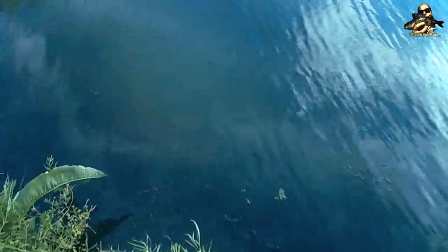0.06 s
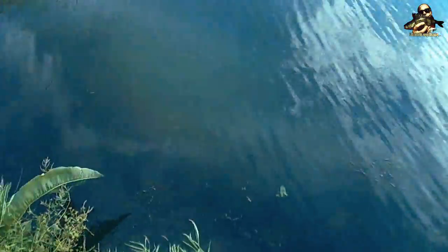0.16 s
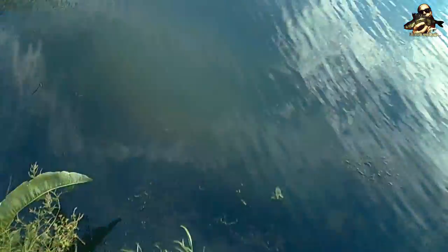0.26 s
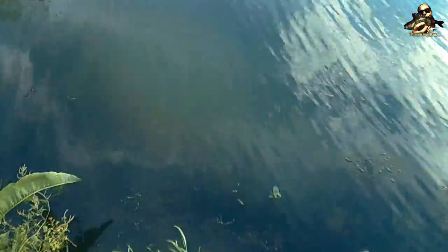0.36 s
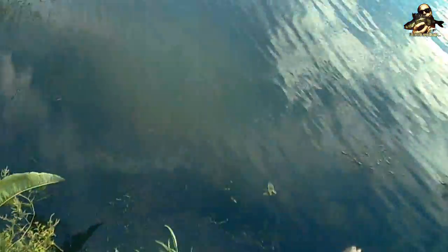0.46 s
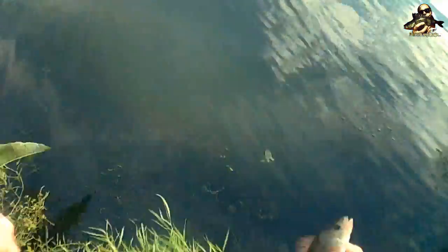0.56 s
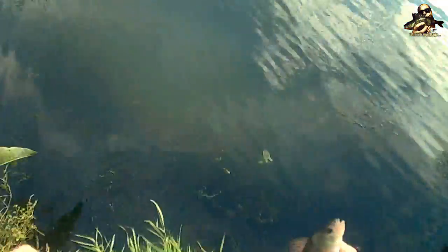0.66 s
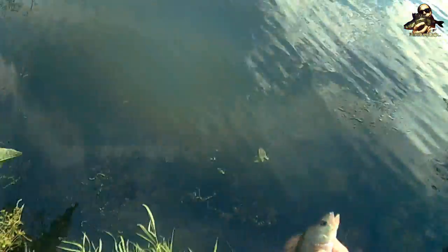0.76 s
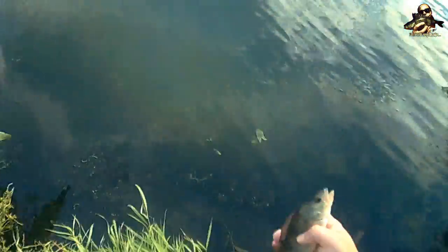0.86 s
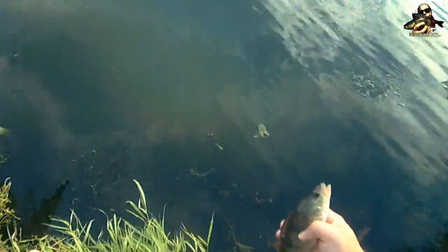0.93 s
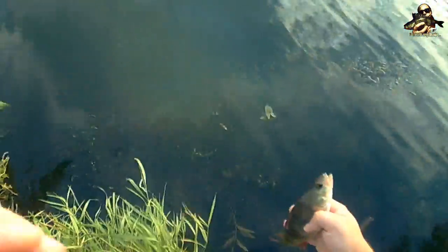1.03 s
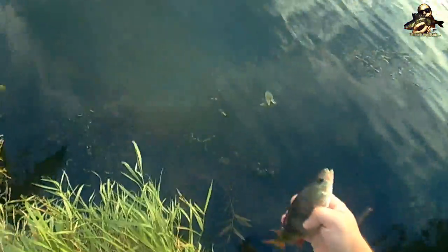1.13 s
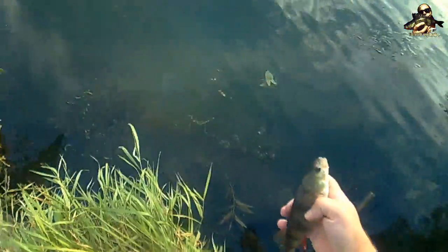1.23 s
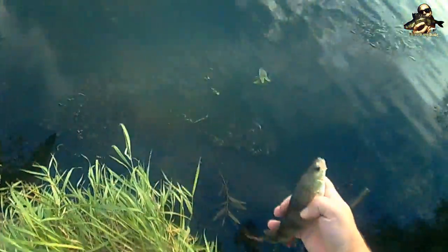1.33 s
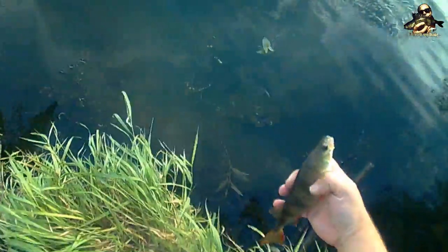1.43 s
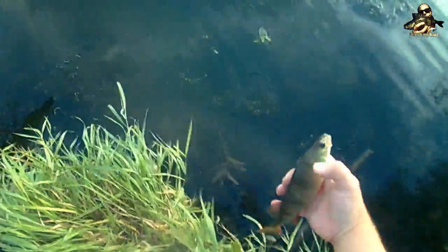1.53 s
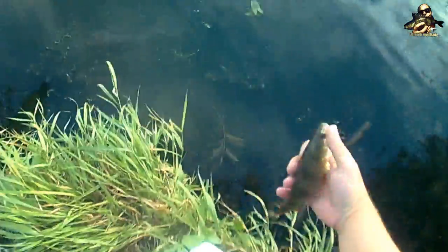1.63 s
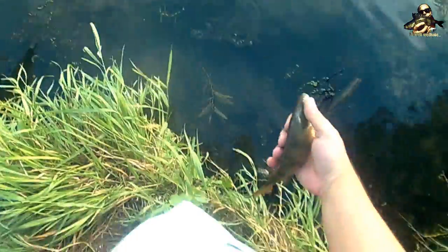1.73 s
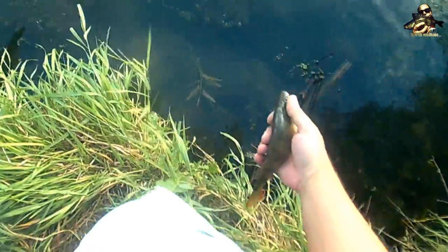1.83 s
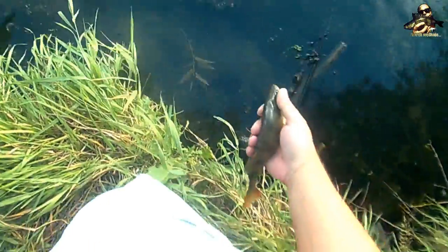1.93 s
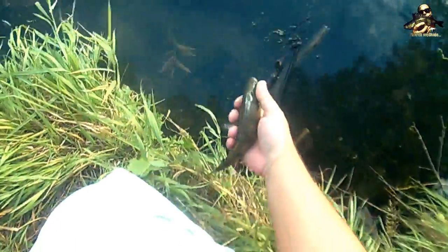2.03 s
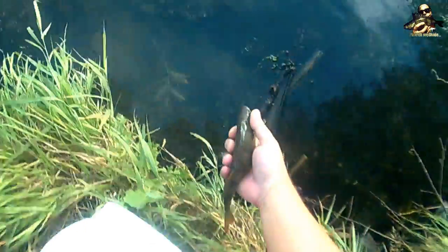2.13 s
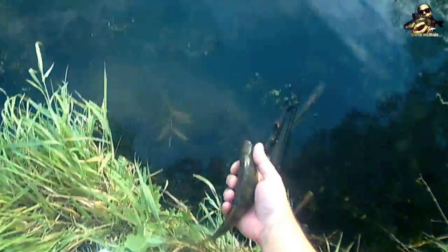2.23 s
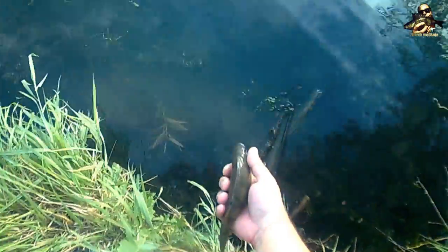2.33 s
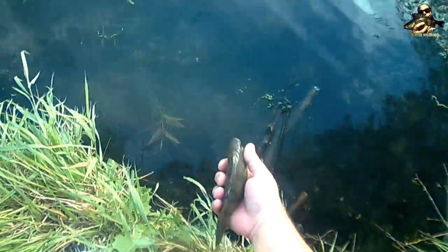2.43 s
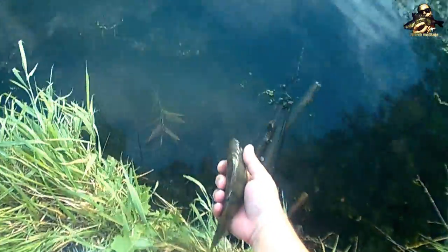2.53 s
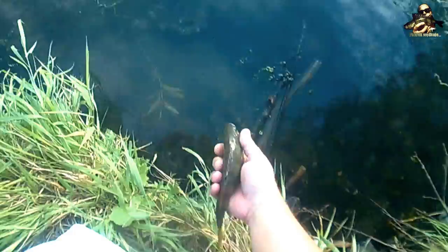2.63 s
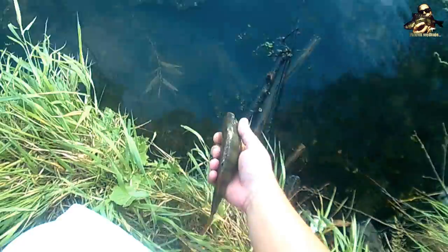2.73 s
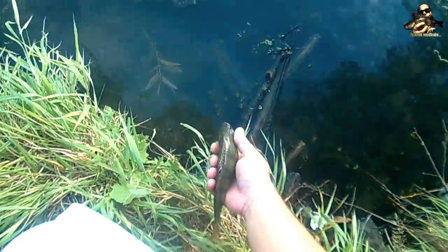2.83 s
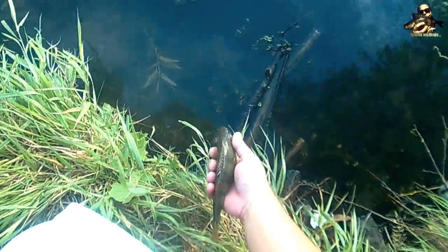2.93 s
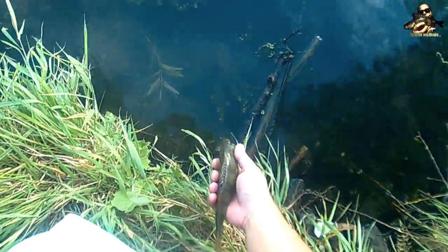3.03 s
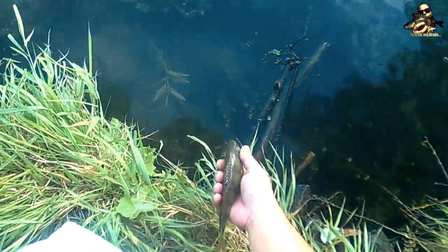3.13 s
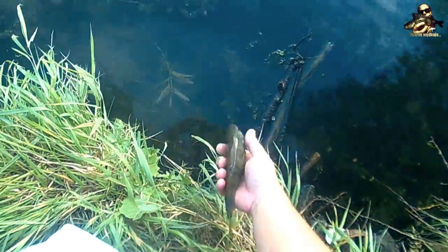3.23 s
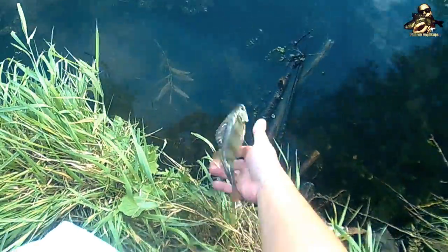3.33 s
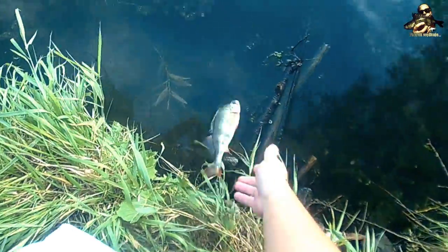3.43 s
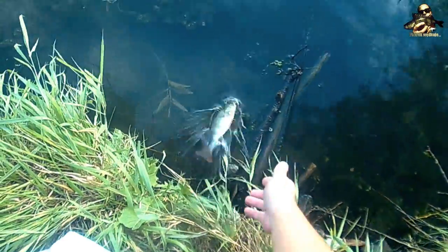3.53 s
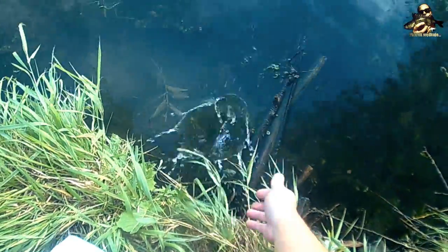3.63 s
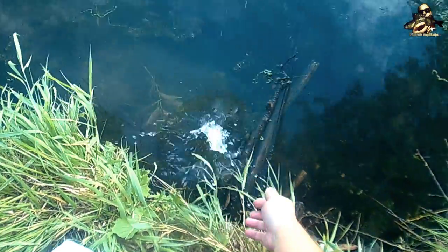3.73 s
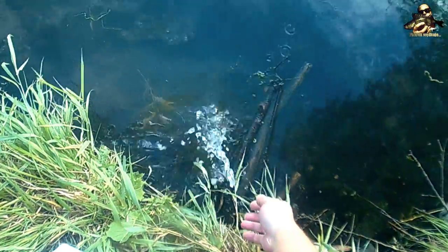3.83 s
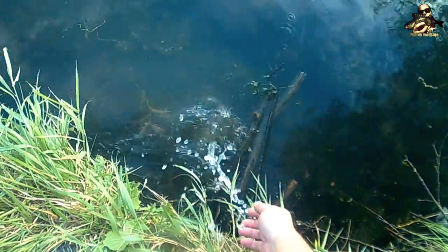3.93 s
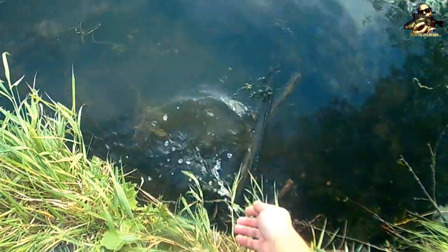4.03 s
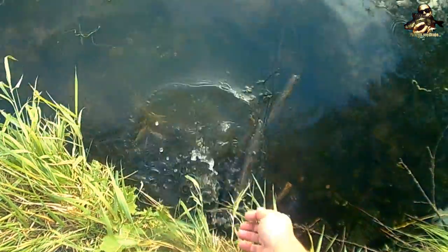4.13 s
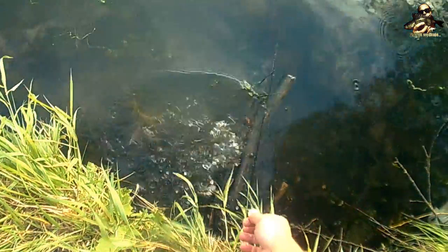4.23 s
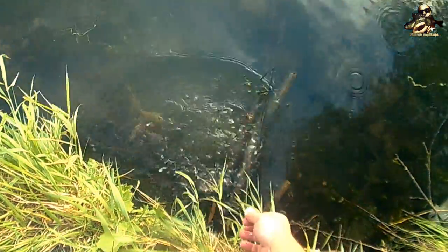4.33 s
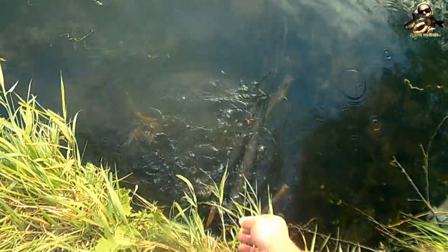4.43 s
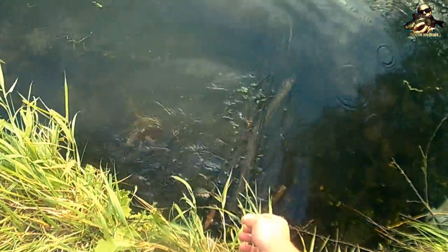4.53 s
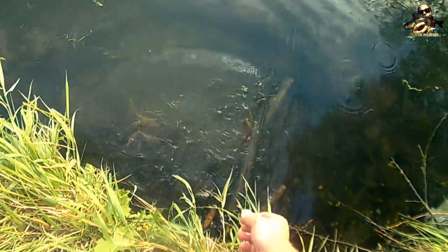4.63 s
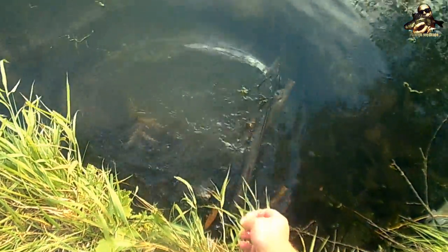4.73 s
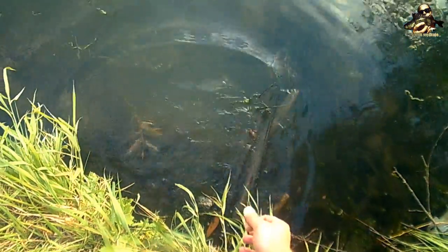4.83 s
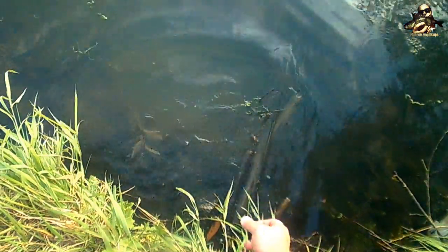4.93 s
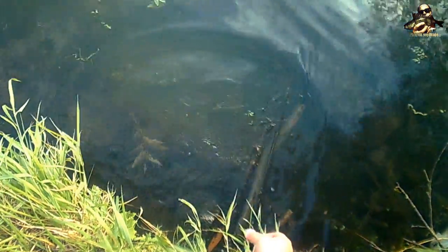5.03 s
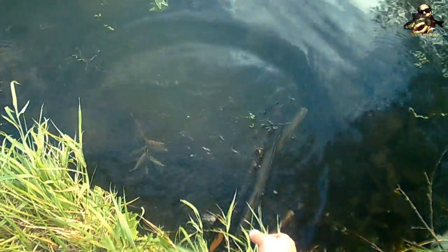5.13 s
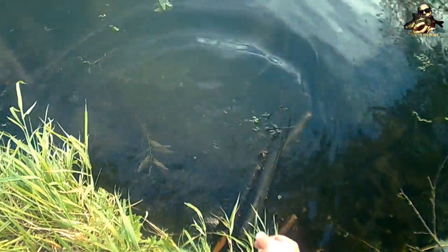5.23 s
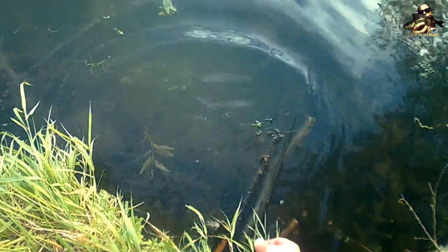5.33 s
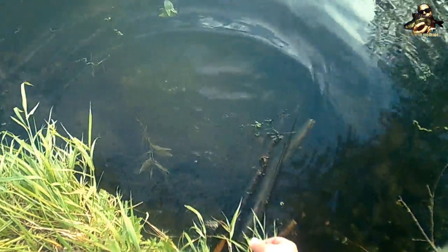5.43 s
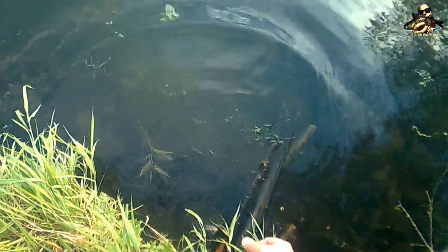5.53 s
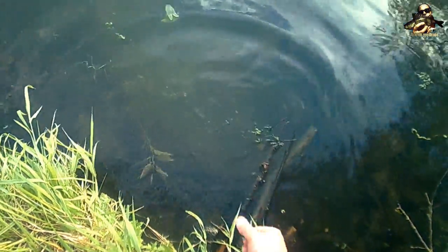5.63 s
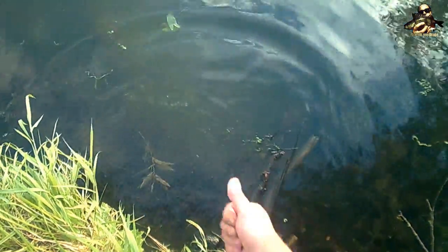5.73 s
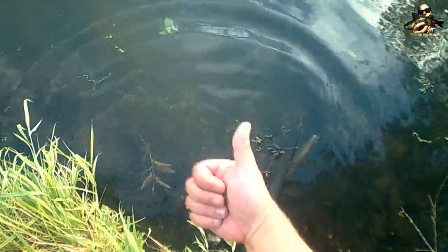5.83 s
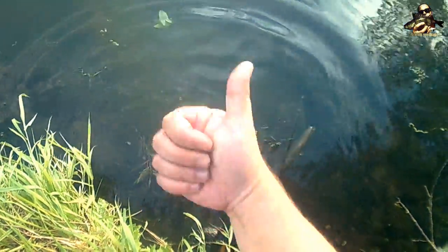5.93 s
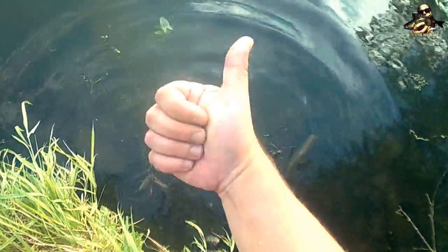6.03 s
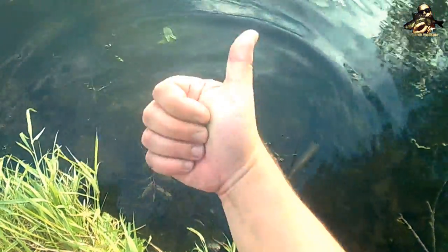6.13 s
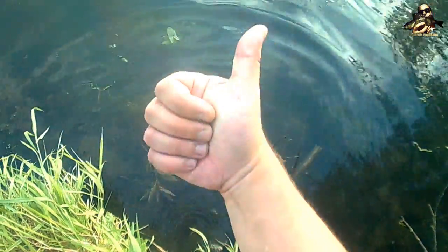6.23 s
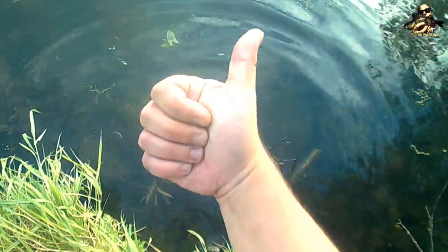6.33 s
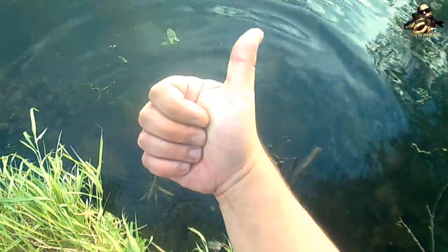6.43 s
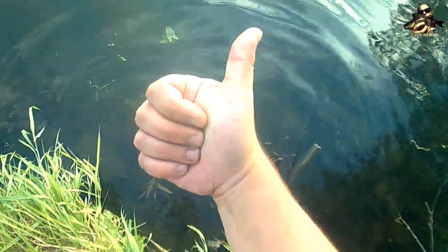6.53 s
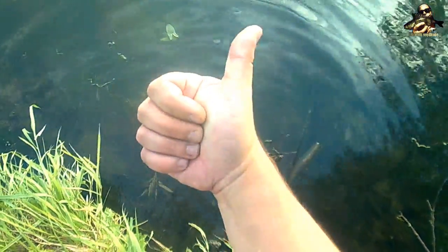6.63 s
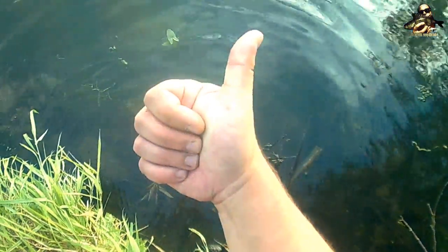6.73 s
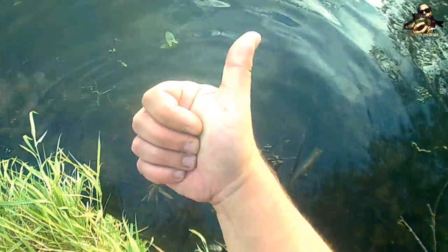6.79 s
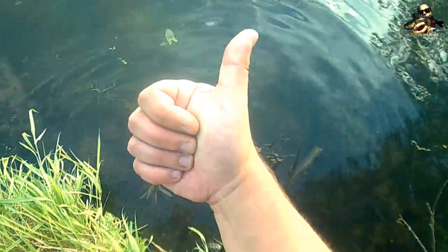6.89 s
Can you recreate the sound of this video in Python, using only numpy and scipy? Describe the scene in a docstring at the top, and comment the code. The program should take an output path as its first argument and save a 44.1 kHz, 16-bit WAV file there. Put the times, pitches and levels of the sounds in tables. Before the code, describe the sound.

Clothing rustles softly right by the microphone, then its plastic mount gives a cluster of sharp knocks and tiny creaks, followed by one more click. After a short lull, a fish tossed from the bank slaps into a calm river with a light spray and a brief run of gurgling bubbles. Only a faint, steady outdoor hiss and a few tiny drips remain. Everything sounds muffled and boxy.

```python
"""Clothing rustles close by, then a camera mount knocks and creaks as an angler bends on a grassy bank.
A tossed fish slaps the calm river: a low thud, a thin spray, and trapped air ringing as bubbles.
Far air and river hiss lie underneath. The one microphone is shut in the camera's plastic housing,
which muffles sound above its resonance; a coarse rate change mirrors the sound into the treble."""
import sys
import numpy as np
from scipy import signal
from scipy.fft import rfft, irfft, next_fast_len
from scipy.io import wavfile
from scipy.ndimage import uniform_filter1d

SR = 44100
rng = np.random.default_rng(int(sys.argv[2]) if len(sys.argv) > 2 else 0)


def pcm_store(signal):
    """Save signal as 16-bit PCM."""
    levels = np.round(np.clip(np.atleast_2d(signal), -1, 1) * 32767)
    wavfile.write(sys.argv[1], SR, levels.astype(np.int16).T)


N = 306936

# distant air and river: frequency_hz, relative_db
HISS_SPECTRUM = [(20, -49), (100, -20), (260, -13), (600, -5.5), (850, 0), (1200, -5.5), (1550, -12),
                 (2000, -23), (3000, -38.5), (4000, -45.5), (5000, -58), (9000, -53.5), (17000, -47)]
# rumble of the turning camera: time_s, level_db
RUMBLE_LEVELS = [(0.0, -70), (0.106, -61.5), (0.268, -67), (0.588, -73), (0.7, -79)]
# clothing near the microphone: time_s, level_db, centre_hz
RUSTLE_PATH = [(0.0, -39, 1240), (0.07, -36.5, 1150), (0.27, -53.5, 840), (0.43, -46.5, 900),
               (0.57, -49, 945), (0.8, -39.5, 950), (1.02, -52.5, 1080), (1.27, -54.5, 1190),
               (1.46, -46, 1020), (1.62, -52, 1050), (1.74, -42.5, 1450), (1.87, -62, 1420),
               (1.95, -39.5, 1360), (2.05, -47.5, 970), (2.3, -57, 980), (2.6, -48, 910)]
# creaks of the mount: start_s, length_s, level_db, pitch_hz
MOUNT_CREAKS = [(1.096, 0.015, -21.5, 1400), (1.114, 0.026, -25.5, 1330), (1.172, 0.0164, -17.5, 1530),
                (1.335, .011, -31.5, 1390), (1.354, 0.014, -25.5, 1250), (1.402, 0.031, -36.5, 1336),
                (1.73, 0.02, -32, 1480), (1.745, 0.028, -33.5, 1540), (1.837, 0.048, -41.5, 1430),
                (1.876, 0.024, -32.5, 1470), (1.9, 0.011, -27.5, 1524), (1.95, 0.057, -43, 1490),
                (2.164, 0.012, -43, 1556), (2.379, 0.0045, -35, 1400), (2.414, 0.0081, -12.5, 1507),
                (2.423, 0.0052, -31.5, 1470), (2.443, 0.036, -41.5, 1380)]
# knocks of the mount: start_s, peak_db, contact_ms, main_mode_boost_db
MOUNT_KNOCKS = [(0.078, -32, 0.15, -14), (0.1758, -30.5, 0.1, -8), (1.097, -22, 0.14, 5),
                (1.1009, -6.5, 0.13, -5), (1.1064, -5, 0.059, -4.5), (1.1116, -7.5, 0.25, -5.5),
                (1.138, -2.5, 0.19, -8.5), (1.1444, -15, 0.27, -2), (1.1746, -7.5, 0.035, -4),
                (1.309, -35, 0.15, 7), (1.3365, -23, 0.07, -1), (1.3503, -7.5, 0.18, -8.5),
                (1.3706, -2.5, 0.16, -8), (1.3736, -8, 0.16, -6.5), (1.382, -28, 0.089, -3),
                (1.4137, -21, 0.14, -4), (1.556, -32, 0.071, -6), (1.679, -19.5, 0.17, -3.5),
                (1.7095, -23, 0.18, -2), (1.722, -17.5, 0.16, -3), (1.8946, -21, 0.21, -9),
                (1.9039, -24.5, 0.12, 2), (2.094, -28, 0.24, -6), (2.4151, -4.5, 0.062, -3),
                (4.8986, -34, 0.29, -12), (5.539, -25.5, 0.21, -4.5)]
# resonances of the housing: centre_hz, width_hz, gain_db
HOUSING_MODES = [(488, 440, -18), (1012, 407, -5), (1450, 414, 4), (3060, 720, -4.5)]
# churned water, outside the housing: time_s, level_db
CHURN_LEVELS = [(3.387, -40), (3.446, -45), (3.572, -38), (3.84, -47), (3.946, -42), (4.05, -42.5),
                (4.19, -33.5), (4.32, -81)]
# spray thrown by each slap: start_s, gain_db
SPRAY_BURSTS = [(3.39, -46), (3.411, -38), (3.452, -37), (3.531, -24), (3.543, -29), (3.58, -47),
                (3.93, -40.5), (3.995, -40), (4.06, -48), (4.124, -43), (4.165, -50), (4.233, -50.5)]
# the fish meets the surface: start_s, gain_db, t60_s
FISH_THUD = (3.519, -29.5, 0.11)
# slap pockets, bubbles and drips, outside the housing: start_s, gain_db, pitch_hz, t60_s, glide_per_s
AIR_POCKETS = [(3.4067, -6.5, 1388, 0.029, -27), (3.413, -10, 926, 0.024, -9),
               (3.431, -26.5, 950, 0.024, 4), (3.4535, -11, 1540, 0.0068, -3), (3.454, -22, 850, 0.021, 4),
               (3.473, -29, 1244, 0.033, 8), (3.5164, -11, 1447, 0.023, 3), (3.5194, -3.5, 827, 0.03, 0),
               (3.5228, -4, 1318, 0.059, -8.5), (3.5232, -14.5, 394, 0.02, -12.5),
               (3.5353, -13.5, 1550, 0.025, 3), (3.5336, -8.5, 848, 0.034, 4),
               (3.546, -33.5, 359, 0.18, -0.5), (3.5452, -6, 1320, 0.029, 5), (3.567, -30, 1410, 0.033, -1),
               (3.5968, -24.5, 1390, 0.017, 2.5), (3.6247, -21, 1320, 0.047, 4.5),
               (3.655, -41, 531, 0.19, 9.5), (3.6562, -23.5, 1430, 0.06, 0.5),
               (3.686, -29.5, 980, 0.017, -4), (3.6936, -34, 863, 0.29, 5.5), (3.755, -37, 635, 0.22, 8),
               (3.8636, -17, 1395, 0.028, 3.5), (3.87, -24.5, 1084, 0.052, 4),
               (3.887, -31, 1260, 0.064, 11), (3.915, -18.5, 1375, 0.071, 7.5),
               (3.9316, -16, 1081, 0.11, 1), (3.9314, -16, 1680, 0.016, -7),
               (3.9413, -17.5, 1366, 0.065, -5.5), (3.9444, -14.5, 982, 0.033, -11),
               (3.9538, -28.5, 750, 0.13, 2.5), (3.961, -24.5, 1523, 0.044, -3.5),
               (3.964, -25.5, 1110, 0.074, 11.5), (3.9858, -21.5, 1111, 0.058, 5.5),
               (4.012, -35, 1760, 0.022, 14), (4.061, -25.5, 1024, 0.02, -2),
               (4.0827, -17.5, 915, 0.043, -2.5), (4.112, -20.5, 1513, 0.019, -1),
               (4.113, -19.5, 1243, 0.033, -28), (4.1389, -17, 848, 0.11, 3),
               (4.1402, -27.5, 530, 0.054, 1.5), (4.1525, -23, 741, 0.059, -7),
               (4.1593, -16.5, 865, 0.03, 2), (4.1646, -20.5, 1272, 0.1, -5.5),
               (4.1761, -23, 846, 0.05, -5.5), (4.1905, -23, 1054, 0.032, 10),
               (4.211, -27, 1450, 0.022, 13), (4.268, -39, 1710, 0.035, 0.0),
               (4.554, -30, 1434, 0.018, 2.5), (5.808, -40, 1290, 0.032, 5.0),
               (6.626, -40, 1370, 0.017, 5.0), (6.897, -33, 1380, 0.014, 7)]


def amp(db):
    """Gain of a level in dB."""
    return 10 ** (np.asarray(db) / 20)


def unit(x):
    """Scaled to rms 1."""
    return x / np.sqrt(np.mean(x ** 2) + 1e-20)


def envelope(rows, fade_s=0.036):
    """Gain per sample from time_s and level_db; fades to -90 dB outside the table."""
    times, db = np.transpose(rows)[:2]
    times = [times[0] - fade_s, *times, times[-1] + fade_s]
    return amp(np.interp(np.arange(N) / SR, times, [-90, *db, -90]))


def add(track, start_s, sound):
    """Mixes a sound into the track."""
    track[round(start_s * SR):][:len(sound)] += sound


def resonance(f, hz, width_hz):
    """Response of one mode."""
    return 1j * f * width_hz / (hz * hz - f * f + 1j * f * width_hz)


def filtered(x, response):
    """Applies a complex frequency response."""
    size = next_fast_len(len(x) + 8192)
    return irfft(rfft(x, size) * response(np.fft.rfftfreq(size, 1 / SR)), size)[:len(x)]


def patchy_noise(gain, patchy_db=1.5):
    """Noise of rms 1, shaped by gain(hz, t) and flickering in random patches."""
    hz, t, spectra = signal.stft(rng.standard_normal(N), SR, nperseg=512)
    patches = uniform_filter1d(rng.standard_normal(spectra.shape), size=4, axis=0)
    patches = uniform_filter1d(patches, size=6, axis=1)
    spectra = spectra * gain(hz[:, None], t[None]) * amp(patchy_db * unit(patches))
    return unit(signal.istft(spectra, SR, nperseg=512)[1][:N])


def wall(hz, corner_hz=1755, leak_db=-20):
    """The plastic around the microphone passes little treble: a steep fall, then a faint leak."""
    b, a = signal.butter(8, 2 * np.pi * corner_hz, analog=True)
    return signal.freqs(b, a, 2 * np.pi * hz)[1] + amp(leak_db) / (1 + 1j * hz / 3500) ** 2


def bubble(hz, attack_ms, t60, glide, size=6615):
    """A pocket of air rings once, its pitch gliding; the envelope peaks at 1."""
    t = np.arange(size) / SR
    ring = (1 - np.exp(-2000 * t / attack_ms)) ** 2 * amp(-60 * t / t60)
    phase = 2 * np.pi * hz * (t + glide * np.minimum(t, t60) * t / 2)
    return ring / ring.max(axis=-1, keepdims=True) * np.sin(phase)


def river_hiss(level_db=-48.5):
    """Far air and river noise, steady."""
    f, db = np.transpose(HISS_SPECTRUM)
    return amp(level_db) * patchy_noise(lambda hz, t: amp(np.interp(np.log(hz + 1), np.log(f), db)))


def camera_rumble():
    """A soft low rumble at the microphone while the camera turns."""
    return envelope(RUMBLE_LEVELS) * patchy_noise(lambda hz, t: np.abs(resonance(hz + 1, 120, 200)))


def clothing_rustle():
    """Cloth rubs near the housing: grainy noise with a hollow ring around a wandering centre."""
    times, _, centre_hz = np.transpose(RUSTLE_PATH)

    def band(hz, t):
        centre = np.interp(t, times, centre_hz)
        broad = amp(-9 * np.abs(np.log2((hz + 20) / centre)) ** 1.5)
        hollow = 1.9 * np.abs(resonance(hz + 1, centre, 150))
        gain = (broad + hollow) * np.abs(wall(hz[:, 0]))[:, None] ** 2
        return gain / np.linalg.norm(gain, axis=0)
    return envelope(RUSTLE_PATH) * patchy_noise(band)


def mount_creaks(size=8192):
    """Stick-slip in the mount keeps a narrow mode singing unevenly, over a broader scrape."""
    track = np.zeros(N + size)
    t, f = np.arange(size) / SR, np.fft.rfftfreq(size, 1 / SR)
    scrape = amp(-19) * resonance(f, 1150, 870) + amp(-19.5) * resonance(f, 3400, 1200)
    for start_s, length_s, db, hz in MOUNT_CREAKS:
        gate = np.clip(np.minimum(t, length_s - t) / 0.00082, 0, 1)
        friction = gate * rng.standard_normal(size)
        creak = irfft(rfft(friction) * wall(f) * (resonance(f, hz, 218) ** 2 + scrape), size)
        rms = np.sqrt(np.sum(creak ** 2) / (length_s * SR))
        add(track, start_s, amp(db) * creak / rms)
    return track[:N]


def mount_knocks(size=8192):
    """Right at the microphone, each blow and its dying scrape ring the housing."""
    track = np.zeros(N + size)
    t, f = np.arange(size) / SR, np.fft.rfftfreq(size, 1 / SR)
    low, broad, main, high = [(-1) ** k * amp(db) * resonance(f, hz, width_hz)
                              for k, (hz, width_hz, db) in enumerate(HOUSING_MODES)]
    for start_s, peak_db, contact_ms, boost_db in MOUNT_KNOCKS:
        scrape_t60_s = 0.016 * (0.097 / contact_ms) ** 1.25  # briefer contacts skid longer
        force = 0.33 * rng.standard_normal(size) * amp(-60 * t / scrape_t60_s)
        force[0] += rng.choice([-1, 1])  # the blow
        contact_phase = 2 * np.pi * f * contact_ms / 2000
        softness = np.exp(-0.5 * contact_phase ** 2 - 2j * contact_phase)  # long contacts are duller
        modes = low + broad + amp(boost_db) * main + high
        knock = irfft(rfft(force) * softness * wall(f) * modes, size)
        add(track, start_s, amp(peak_db) * knock / np.abs(knock).max())
    return track[:N]


def churn(count=1500, ring_cycles=22):
    """Stirred water frees a swarm of small bubbles, each rising in pitch."""
    swarm = np.zeros(N + SR)
    first_s, last_s = CHURN_LEVELS[0][0], CHURN_LEVELS[-1][0]
    starts = rng.uniform(first_s - 0.05, last_s, count)
    hz = np.clip(1000 * amp(3.1 * rng.standard_normal((count, 1))), 550, 3600)
    gains = amp(rng.exponential(3.1, count))
    rings = bubble(hz, attack_ms=2.0, t60=ring_cycles / hz, glide=9.3, size=2048)
    for start_s, gain, ring in zip(starts, gains, rings):
        add(swarm, start_s, gain * ring)
    rms = np.std(swarm[round(first_s * SR):round(last_s * SR)])
    return envelope(CHURN_LEVELS) * swarm[:N] / rms


def spray(t60_s=0.055, rise_s=0.0037):
    """Each slap throws droplets whose tiny impacts fizz near 3 kHz."""
    bursts = np.zeros(N + SR)
    t = np.arange(SR // 4) / SR
    for start_s, db in SPRAY_BURSTS:
        add(bursts, start_s, amp(db - 60 * t / t60_s) * (1 - np.exp(-t / rise_s)))
    droplets = rng.standard_normal(N + SR) * (rng.uniform(size=N + SR) < 0.03)
    fizz = unit(filtered(droplets, lambda f: resonance(f, 2820, 860) ** 2))
    return (bursts * fizz)[:N]


def fish_thud(rise_s=0.0021):
    """The body of the fish pushes the water aside: a low puff without a ring."""
    start_s, db, t60_s = FISH_THUD
    t = np.maximum(np.arange(N) / SR - start_s, 0)
    puff = amp(db - 60 * t / t60_s) * (1 - np.exp(-t / rise_s))
    return puff * unit(filtered(rng.standard_normal(N), lambda f: resonance(f, 190, 220)))


def air_pockets():
    """Large pockets of air and drips ring one by one; the moving surface shakes each ring."""
    track = np.zeros(N + SR)
    for start_s, db, hz, t60_s, glide in AIR_POCKETS:
        attack_cycles = 1.6 * (1 + 0.057 * abs(glide))  # fast gliders swell more slowly
        ring = bubble(hz, 1000 * attack_cycles / hz, t60_s, glide)
        add(track, start_s, amp(db) * rng.choice([-1, 1]) * ring)
    shiver = filtered(rng.standard_normal(N + SR), lambda f: 1 / (1 + (f / 250) ** 2))
    return (track * (1 + 0.17 * unit(shiver)))[:N]


def fish_splash(low_cut_hz=200):
    """The fish lands, heard from the bank: bubbles muffled by the housing, plus spray and thud."""
    pockets, droplets, swarm = air_pockets(), spray(), churn()
    bubbles = filtered(pockets + swarm, lambda f: wall(f) * (1j * f / (low_cut_hz + 1j * f)) ** 2)
    return bubbles + droplets + fish_thud()


def scene():
    """Mount, river and angler at one microphone on the bank."""
    foreground = mount_knocks() + mount_creaks() + fish_splash()
    background = clothing_rustle() + camera_rumble() + river_hiss()
    return (foreground + background)[None]


def record(dry, ceiling=0.75, low_cut_hz=45, fast_rate_hz=48000, top_hz=15900):
    """The camera clips softly, rolls off the bass, changes rate coarsely and cuts the top."""
    clipped = dry[0] / (1 + np.abs(dry[0] / ceiling) ** 4.5) ** (1 / 4.5)
    thinned = filtered(clipped, lambda f: (1j * f / (low_cut_hz + 1j * f)) ** 2)
    # repeating samples to reach the faster rate leaves mirror images every 3.9 kHz
    held = thinned[np.arange(N * fast_rate_hz // SR) * SR // fast_rate_hz]
    mirrored = signal.resample_poly(held, SR, fast_rate_hz)[:N]
    return filtered(np.pad(mirrored, (0, N - len(mirrored))), lambda f: f < top_hz)[None]


dry = scene()
out = record(dry)
pcm_store(out)
```